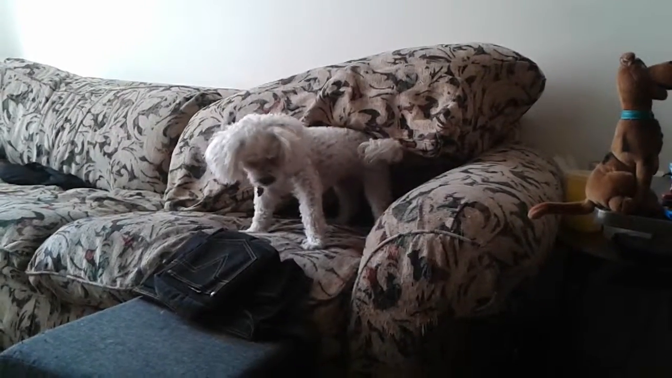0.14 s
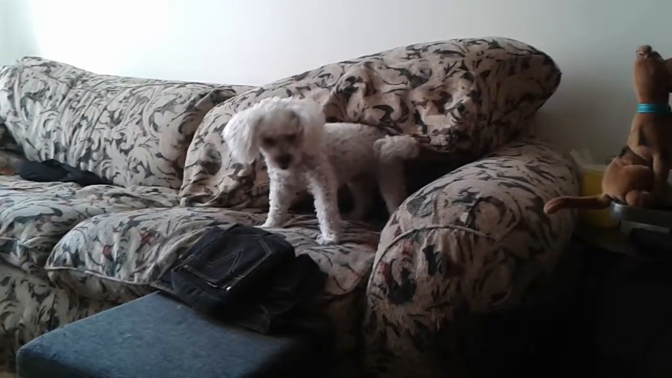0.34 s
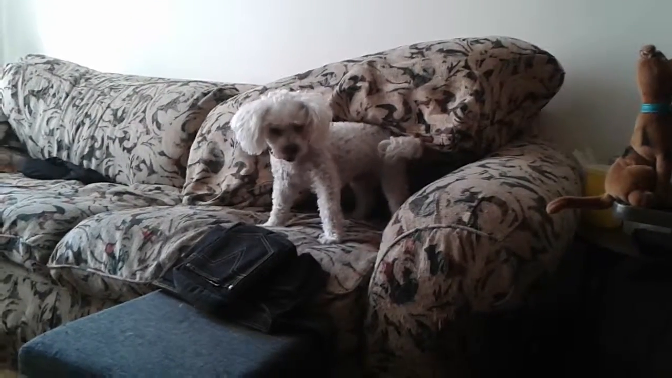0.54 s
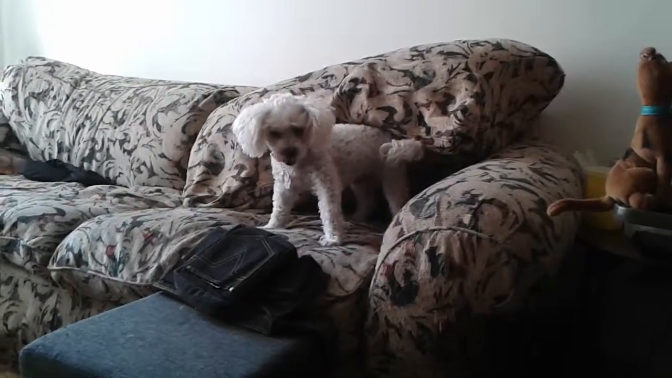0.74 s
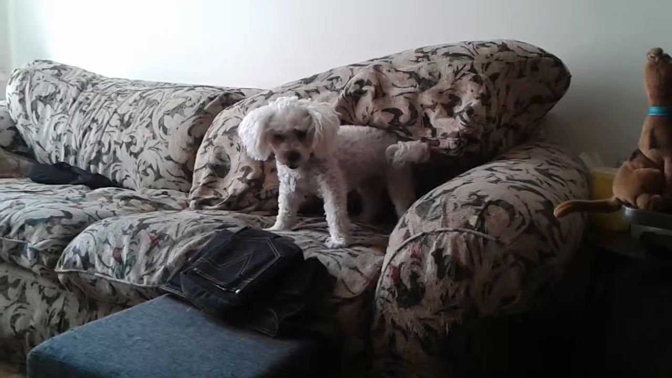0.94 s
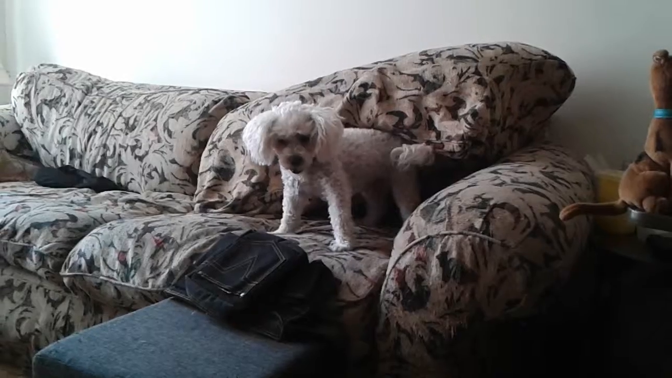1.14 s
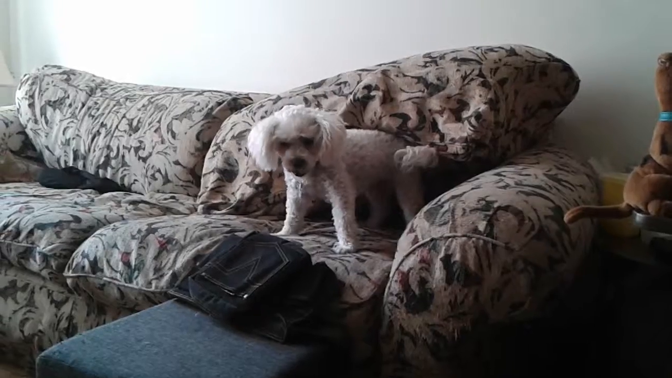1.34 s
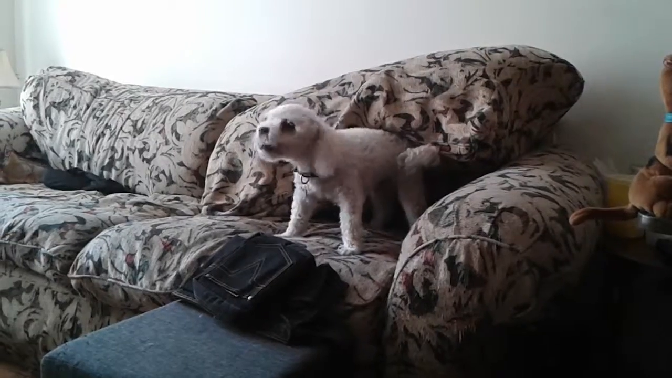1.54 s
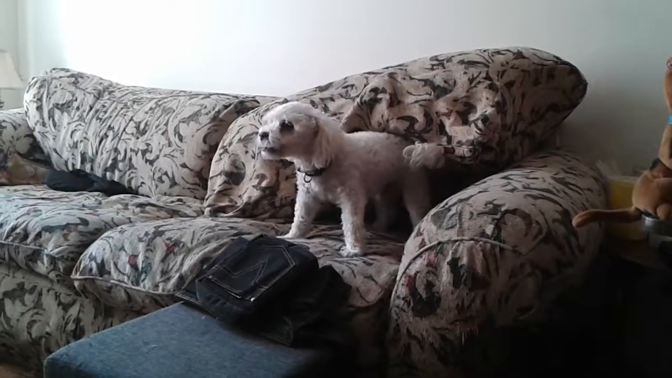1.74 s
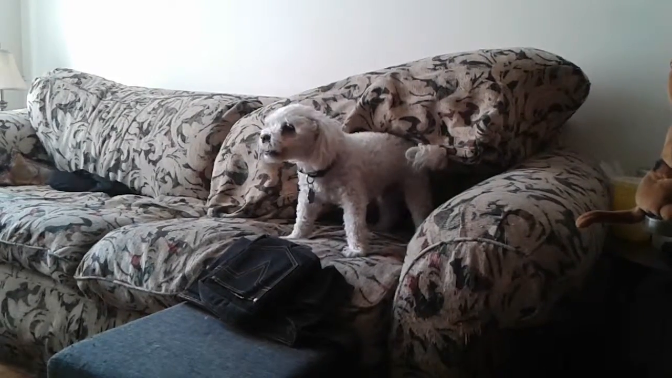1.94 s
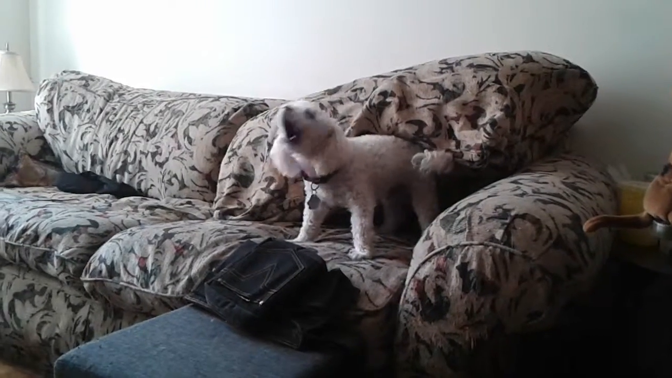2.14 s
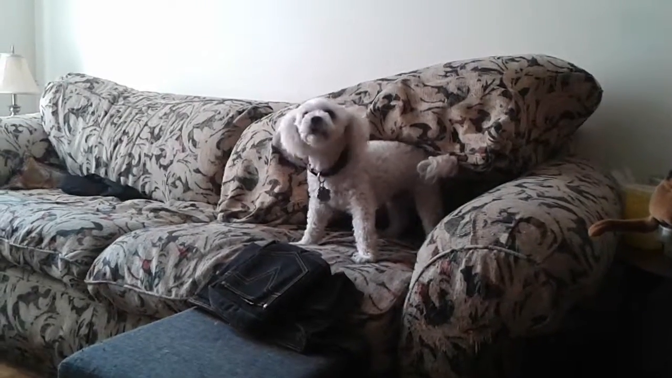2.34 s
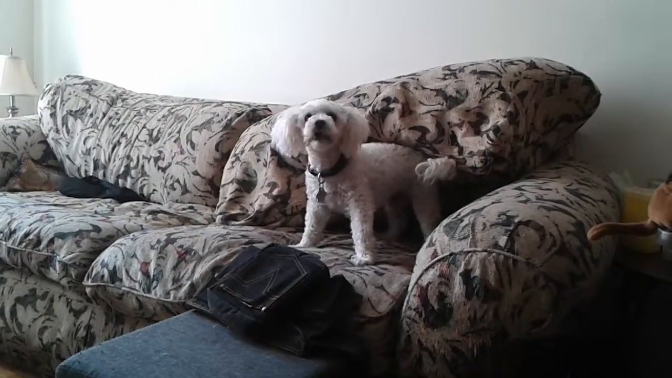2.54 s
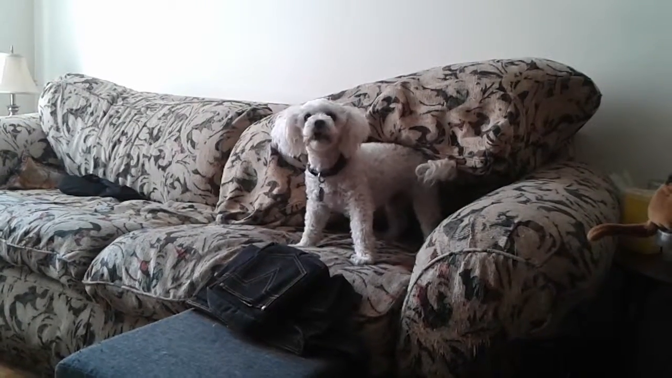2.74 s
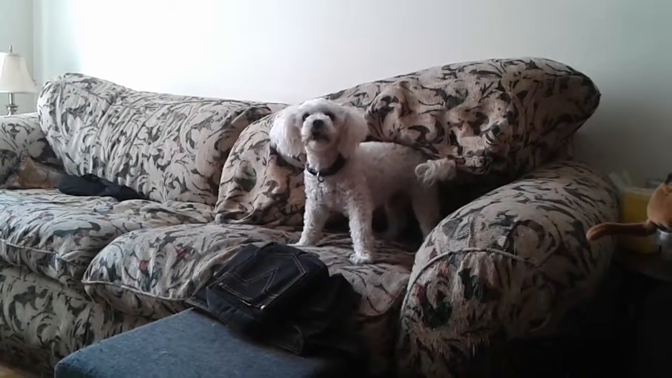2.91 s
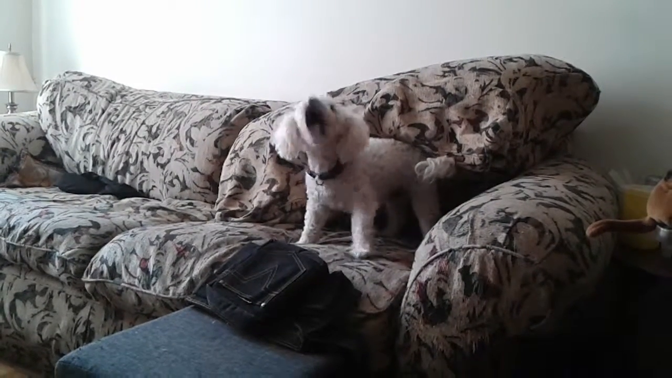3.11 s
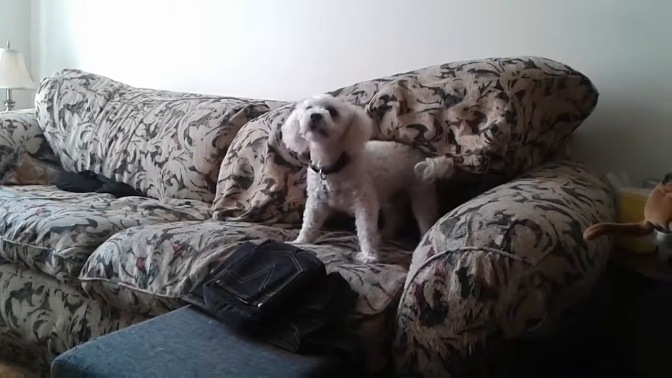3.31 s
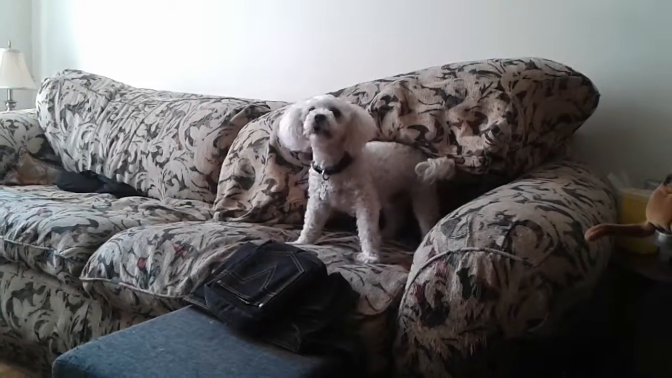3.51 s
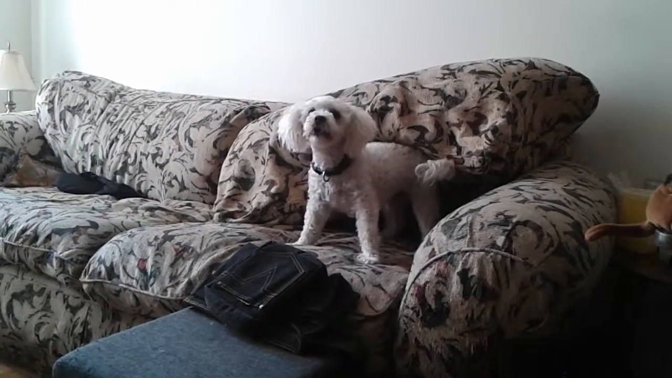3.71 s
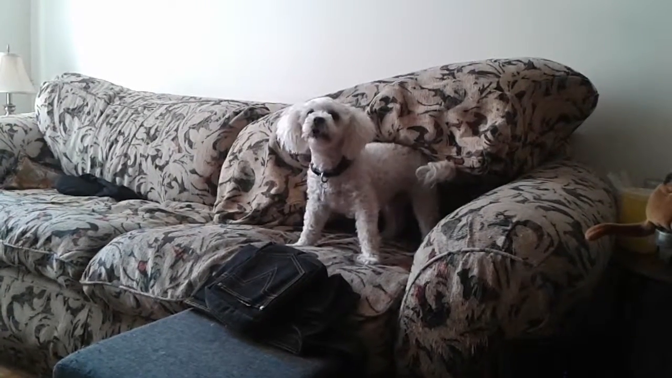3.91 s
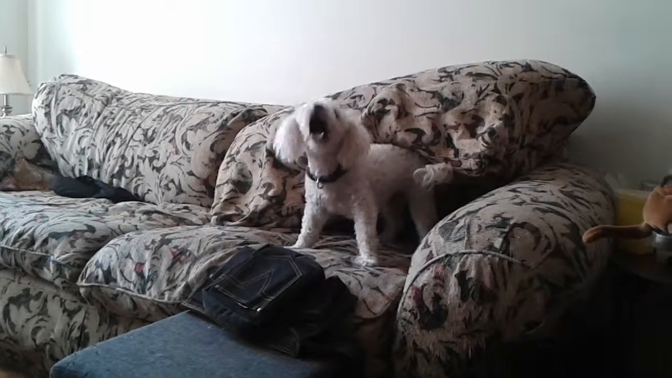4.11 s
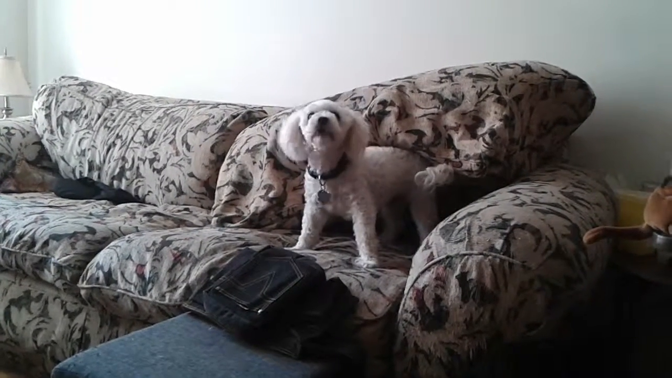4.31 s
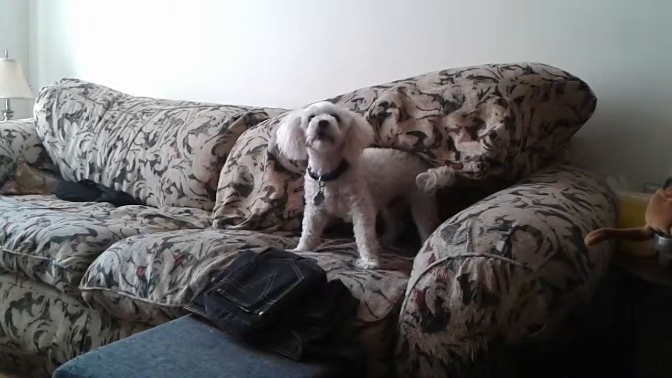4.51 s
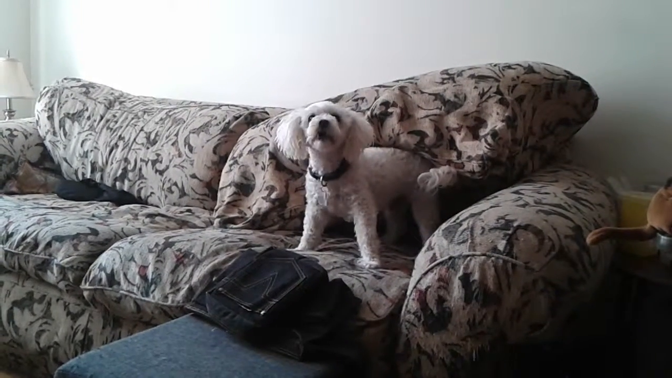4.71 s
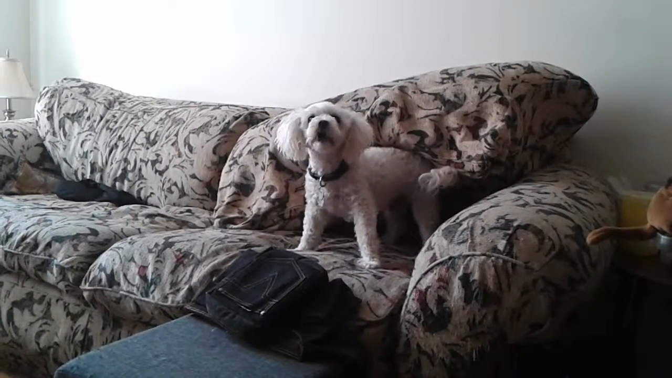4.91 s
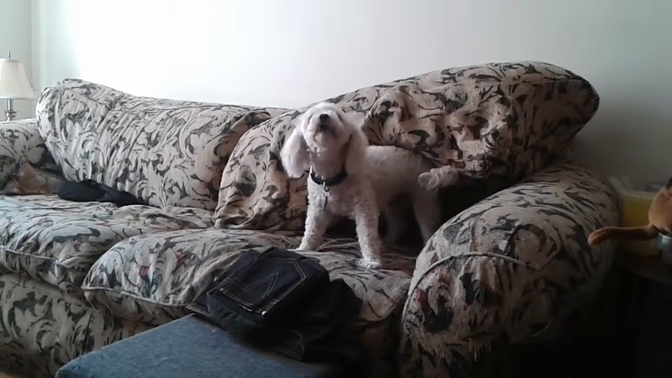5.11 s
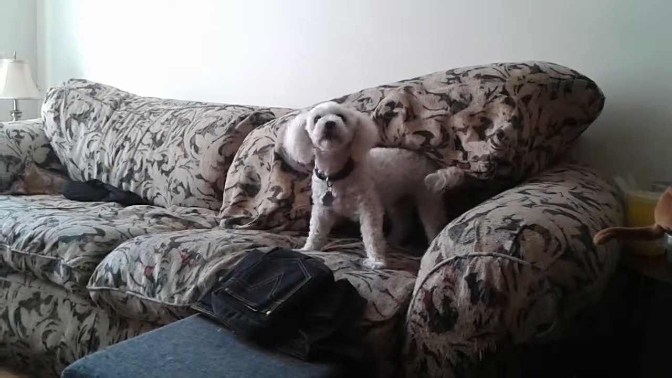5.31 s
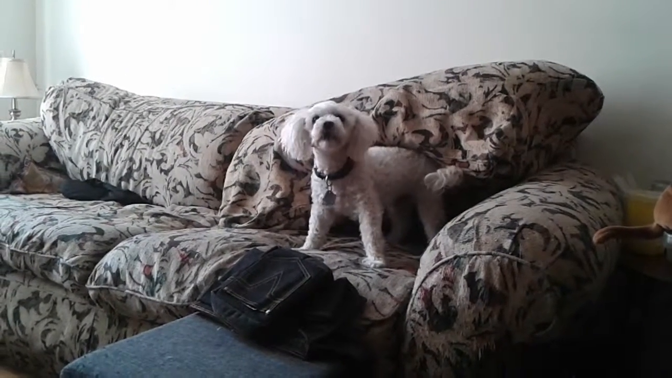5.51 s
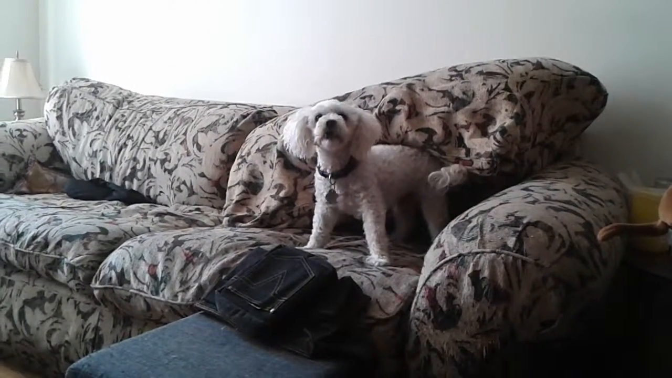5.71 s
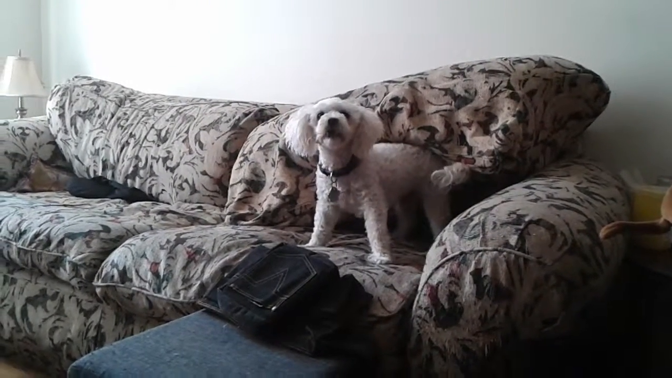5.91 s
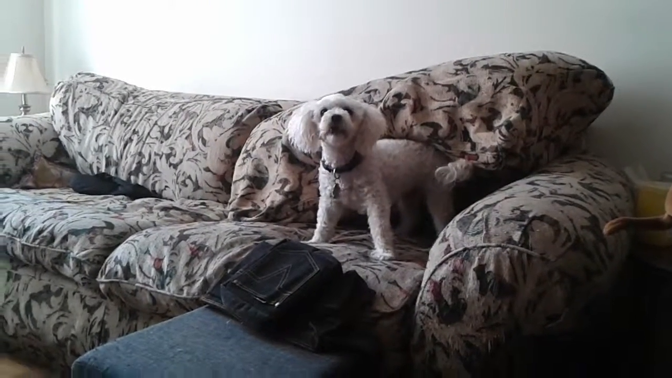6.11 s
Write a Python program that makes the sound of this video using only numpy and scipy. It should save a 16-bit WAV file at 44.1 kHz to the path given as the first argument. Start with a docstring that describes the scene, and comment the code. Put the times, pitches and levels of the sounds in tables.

```python
"""A quiet room tone over a far-off appliance hum comes first, then a puff of breath and thin nose whistles.
A small dog on a couch, near a camera, yips five times, with clicks, grumbles and whines around the yips.
The voice is a bank of partials shaped by the throat, breath is filtered noise, whistles are gliding partials.
A soft furnished room answers in single echoes and a tail.
The first yip makes the gain control turn down."""
import sys
import numpy as np
from scipy import signal
from scipy.fft import rfft, irfft, next_fast_len
from scipy.io import wavfile
from scipy.ndimage import uniform_filter1d, minimum_filter1d

SR = 44100
rng = np.random.default_rng(int(sys.argv[2]) if len(sys.argv) > 2 else 0)


def wrap_up_sound(samples):
    """Save the sound to the file named by the first command line argument, as 16-bit audio."""
    columns = np.atleast_2d(samples).T
    # keep every value between -1 and 1, then stretch to whole-number steps
    tamed = np.clip(columns, -1, 1)
    steps = np.round(tamed * 32767).astype(np.int16)
    wavfile.write(sys.argv[1], SR, steps)


N = 271199
EDGE_HZ = 14800  # upper band edge of the recorder; the voice has no partials above it


def gain_of(db):
    """Turns dB into an amplitude factor."""
    return 10 ** (np.asarray(db) / 20)


def evened(x):
    """Scales a sound to rms 1."""
    return x / np.sqrt(np.mean(x ** 2) + 1e-20)


def read(points, hz):
    """Reads a spectrum between its points on a log-frequency axis."""
    point_hz, value = np.transpose(points)
    return np.interp(np.log(hz + 1), np.log(point_hz + 1), value)


def add(mix, start_s, sound):
    """Adds a sound to the mix at start_s, cut at the end of the mix."""
    part = mix[round(start_s * SR):][:len(sound)]
    part += sound[:len(part)]


def played(rows):
    """Draws the curves of a call at sample rate: its start in seconds, then every other column."""
    time_s, *columns = np.transpose(rows)
    t = np.arange(time_s[0], time_s[-1], 1 / SR)
    return time_s[0], [np.interp(t, time_s, column) for column in columns]


def low_cut(x, order, hz):
    """Removes the sound below hz."""
    return signal.sosfilt(signal.butter(order, hz, "high", fs=SR, output="sos"), x)


def wander(count, hz):
    """Random wobble of rms 1, up to hz."""
    smooth = signal.butter(2, hz, fs=SR, output="sos")
    return evened(signal.sosfilt(smooth, rng.standard_normal(count + 4000))[4000:])


def coloured(x, points):
    """Filters a sound by a spectrum in dB."""
    hz = np.fft.rfftfreq(len(x), 1 / SR)
    return irfft(rfft(x) * gain_of(read(points, hz)), len(x))


def resonate(x, hz, width):
    """Shifts hz down to zero, smooths twice, and shifts back: a steep resonance."""
    turn = np.exp(2j * np.pi * hz * np.arange(len(x)) / SR)
    r = np.exp(-np.pi * width / SR)
    smoothed = signal.lfilter([(1 - r) ** 2], [1, -2 * r, r * r], x / turn)
    return 2 * (turn * smoothed).real


# spectrum of room tone and preamp hiss: hz [Hz], level_db [dB per Hz, relative]
AIR_SPECTRUM = [(21, -48.5), (35, -22.5), (104, -4), (134, -16), (169, -7.5), (201, -5), (501, -17.5),
                (752, -14.5), (1420, -16.5), (2740, -20), (3620, -29), (4670, -20.5), (6010, -36),
                (13200, -46), (15000, -57.5)]
# likeness of left and right in the room tone: hz [Hz], likeness [-1 to 1]
AIR_LIKENESS = [(60, 0.94), (130, 0.86), (290, 0.76), (630, 0.93), (1380, -0.6), (3030, -0.13),
                (6630, 0.38), (14500, -0.32)]
# bands of the wavering appliance hum: pitch_hz [Hz], width_hz [Hz], level_db [dB]
HUM_BANDS = [(59.4, 11, -78.5), (114.3, 12, -70), (169, 15, -64.5), (234, 14, -68.5)]
AIR_DB = -58.5  # rms of the room tone before the ports and the recorder


def air():
    """Room tone and hiss as random short-time spectra, and the hum as noise through narrow resonances."""
    frames, hz = N // 256 + 5, np.fft.rfftfreq(1024, 1 / SR)
    a, b, c, d, patches = rng.standard_normal((frames, 513, 5)).T
    patches_db = evened(uniform_filter1d(uniform_filter1d(patches, 12, 0), 14, 1))
    likeness = np.clip(read(AIR_LIKENESS, hz), -1, 1)[:, None]
    left = a + 1j * b
    right = likeness * left + np.sqrt(1 - likeness ** 2) * (c + 1j * d)
    spectra = np.array([left, right]) * gain_of(read(AIR_SPECTRUM, hz)[:, None] + patches_db)
    tone = signal.istft(spectra, nperseg=1024, noverlap=768)[1][:, :N]
    hum = sum(gain_of(level_db) * evened(resonate(rng.standard_normal(N), pitch_hz, width_hz))
              for pitch_hz, width_hz, level_db in HUM_BANDS)
    return gain_of(AIR_DB) * evened(tone) + hum


# puffs of the dog's breath: start_s [s], level_db [dB], rise_s [s], t60_s [s],
# ring_hz [Hz, centre of the nostril ring], ring_db [dB, relative to the rush]
BREATH_PUFFS = [(0.37, -63.5, 0.0058, 0.28, 3880, -11), (0.722, -59, 0.013, 0.31, 4340, -5),
                (1.37, -54.5, 0.013, 0.25, 1940, -12), (1.385, -53.5, 0.018, 0.22, 4310, -8.5),
                (3.595, -49, 0.0064, .12, 2280, -4), (3.64, -59, 0.019, 0.31, 2317, -8),
                (4.083, -55.5, 0.0068, 0.39, 2400, -5), (4.672, -52, 0.017, 0.19, 3210, 1.5),
                (4.952, -61, 0.0075, 0.18, 2620, -8.5), (5.074, -48.5, 0.025, 0.77, 2650, -12),
                (5.552, -62.5, 0.062, 1.4, 7910, 1)]
# spectrum of the rush: hz [Hz], level_db [dB per Hz, relative]
PUFF_SPECTRUM = [(300, -27.5), (700, -4), (1500, -1), (2500, 1), (4500, -2), (5500, -20.5), (7000, -25.5),
                 (8400, -11.5), (10000, -32.5)]


def puff(start_s, level_db, rise_s, t60_s, ring_hz, ring_db):
    """Rushing air with one nostril resonance on top: noise that rises fast and dies away."""
    t, noise = np.arange(SR // 2) / SR, rng.standard_normal(SR // 2)
    ring = gain_of(ring_db) * evened(resonate(noise, ring_hz, width=350))
    rush = evened(coloured(noise, PUFF_SPECTRUM)) + ring
    rise = np.minimum(t / rise_s, 1) ** 2
    decay_db = -60 * np.maximum(t - rise_s, 0) / t60_s
    flutter_db = 2.5 * wander(len(t), hz=150)
    return start_s, gain_of(level_db + decay_db + flutter_db) * rise * rush


# nose whistles: start_s, crest_s, end_s [s], start_hz, crest_hz, end_hz [Hz],
# first_db and octave_db [dB, fundamental and octave at the crest],
# onset_db [dB, further change of the fundamental at the start]
NOSE_WHISTLES = [(.48, .62, 0.71, 3595, 3580, 3490, -60.5, -79.5, 1.5),
                 (2.819, 3.03, 3.13, 3740, 3490, 3490, -58, -46, -1),
                 (3.782, 3.968, 4.05, 3526, 3600, 3560, -44, -35, -15),
                 (5.806, 5.887, 5.955, 3430, 3370, 3490, -63.5, -45.5, 9.5)]
# third and fourth partial of a whistle: level_db [dB, relative to the octave]
WHISTLE_UPPER = [-36, -31]
SWELL_DB, SINK_DB = -8, -4.5  # level at the start and at the end, relative to the crest
FLICK, FLICK_S = 0.033, .012  # the pitch starts this share high and settles with this time constant


def whistle(start_s, crest_s, end_s, start_hz, crest_hz, end_hz, first_db, octave_db, onset_db):
    """A second, high oscillator in the nose: four thin partials that swell, sink and glide."""
    t, points_s = np.arange(start_s, end_s, 1 / SR), [start_s, crest_s, end_s]
    glide_hz = uniform_filter1d(np.interp(t, points_s, [start_hz, crest_hz, end_hz]), size=2000)
    hz = glide_hz * (1 + FLICK * np.exp((start_s - t) / FLICK_S))
    wobble = 0.0016 * wander(len(hz), hz=80) + 0.0033 * wander(len(hz), hz=15)
    turns = np.cumsum(hz * (1 + wobble)) / SR
    levels_db = [first_db + np.interp(t, points_s, [onset_db, 0, 0]), octave_db]
    levels_db += [octave_db + db for db in WHISTLE_UPPER]
    tone = sum(gain_of(db) * np.cos(2 * np.pi * (k + 1) * turns) for k, db in enumerate(levels_db))
    shape_db = np.interp(t, points_s, [SWELL_DB, 0, SINK_DB]) + 2.1 * wander(len(hz), hz=40)
    return start_s, np.sqrt(2) * tone * gain_of(shape_db) * signal.windows.tukey(len(hz), .15)


# faint clicks: start_s [s], level_db [dB, top of the decay], pitch_hz [Hz], t60_s [s]
FAINT_CLICKS = [(0.973, -40.5, 4430, 0.0083), (2.056, -44, 3390, 0.016), (2.087, -56, 6000, .008),
                (2.099, -63.5, 4010, 0.013), (3.715, -44, 5000, 0.011)]


def click(start_s, level_db, pitch_hz, t60_s):
    """A short ring, widened by a random pitch wobble, with a soft edge."""
    t = np.arange(2000) / SR
    wobbled_s = np.cumsum(1 + 0.34 * wander(2000, hz=900)) / SR
    edge = np.minimum(t / 0.00052, 1)
    return start_s, gain_of(level_db - 60 * t / t60_s) * edge * np.sin(2 * np.pi * pitch_hz * wobbled_s)


# one curve a call, five yips and two quiet grumbles: time_s [s], effort_db [dB], pitch_hz [Hz];
# in a yip the folds start in a low register and jump up to a high one
YIP_CURVES = [
    [(1.532, -58.5, 269.6), (1.556, -33.5, 323.5), (1.572, -31, 407.8), (1.592, -23, 420.7),
     (1.596, -5.5, 1068), (1.617, -15.5, 1143), (1.626, -17, 1098), (1.636, -10, 966), (1.655, -9, 941.6),
     (1.674, -18, 810.5), (1.69, -34, 615)],
    [(2.236, -43, 427.3), (2.255, -28, 560), (2.273, -15, 906), (2.288, -12.5, 916), (2.3, -12.5, 1119),
     (2.318, -20, 1124), (2.333, -12, 982), (2.348, -15, 926.5), (2.362, -24.5, 770), (2.378, -38.5, 560)],
    [(3.2, -38, 263.4), (3.215, -29.5, 342.8), (3.232, -21, 388), (3.246, -12.5, 384.6), (3.25, -15, 938),
     (3.26, -9.5, 1048), (3.275, -10.5, 1103), (3.296, -10, 1043), (3.32, -19, 855.6), (3.352, -33, 481)],
    [(4.183, -43, 255), (4.202, -28.5, 321), (4.218, -20.5, 386.3), (4.234, -10, 370.7),
     (4.238, -16.5, 914), (4.254, -11.5, 985.4), (4.272, -13, 1063), (4.296, -13, 977.3),
     (4.312, -23.5, 786.5), (4.335, -29, 523)],
    [(4.99, -53, 381), (5.005, -56, 376.4), (5.03, -61, 371), (5.048, -55, 348), (5.09, -56.5, 337.5),
     (5.135, -46, 291)],
    [(5.125, -43, 300.6), (5.15, -31.5, 334.1), (5.172, -19.5, 367.6), (5.186, -15, 377.3),
     (5.19, -19.5, 834), (5.204, -13, 990), (5.212, -14, 1011), (5.235, -13.5, 969), (5.252, -23.5, 811),
     (5.278, -32.5, 514)],
    [(5.455, -50.5, 208), (5.48, -55.5, 217.8), (5.52, -51, 243.6), (5.545, -56, 257)],
]
# the voice of each call: tilt_db [dB per octave], ring_db [dB, back of the throat],
# half_share [0-1, half-pitch lines], mouth [factor on the throat],
# low_rough and high_rough [0-1, roughness of the low and the high register]
YIP_VOICES = [(-1, -1.5, .03, 1.01, .3, 0.036), (-.5, -1.5, 0.097, 0.998, 0.25, 0.11),
              (-1.3, -5, 0.29, 1.042, .25, 0.14), (-1, -4, 0.13, 1.037, 0.28, 0.1),
              (-7.5, 13, .02, 0.8, 0.088, .1), (-0.2, 3.5, 0.41, .99, 0.29, 0.13),
              (-3.5, -20, .1, 0.77, .08, .1)]
# resonances of throat and mouth: hz [Hz, at mouth factor 1], level_db [dB, relative]
THROAT_SPECTRUM = [(200, -37), (330, -23.5), (500, -31.5), (700, -8), (1050, 1.5), (1400, -14.5),
                   (2000, -3.5), (2500, -11.5), (2900, -14), (3350, -24), (3900, -17), (4700, -23.5),
                   (5500, -32.5), (8000, -38.5), (11000, -66.5), (15000, -94)]
HALF_DB = -2  # half-pitch lines at full share
LOW_HALF = .15  # share of half-pitch lines in the low register
BREATH_TILT_DB = 4.5  # per octave: rushing air is brighter than the voice
REGISTER_HZ = 620  # below it the voice is hoarse
FULL_DB = -9.5  # effort of a full, open voice
ROUGH_PER_DB = 0.0325  # a weaker voice is rougher by this share
SHUT_PER_DB = .004  # the mouth closes as the effort drops
LOW_OPEN = 0.067  # the mouth gapes this share wider in the low register


def yip(rows, tilt_db, ring_db, half_share, mouth, low_rough, high_rough):
    """Partials of the folds, jittered when hoarse, and gated breath pass a throat that opens and shuts."""
    start_s, (effort_db, hz) = played(rows)
    count = len(hz)
    low = 1 / (1 + (hz / REGISTER_HZ) ** 8)  # near 1 in the low register
    slack_db = np.maximum(FULL_DB - effort_db, 0)
    rough = (high_rough + (low_rough - high_rough) * low) * (1 + ROUGH_PER_DB * slack_db)
    rough = np.clip(rough, 0, 1)
    half_share = np.clip(half_share + (LOW_HALF - half_share) * low, 0, 1)
    mouth = mouth * (1 + LOW_OPEN * low - SHUT_PER_DB * slack_db)
    turns = np.cumsum(hz * (1 + .11 * rough * wander(count, hz=250))) / SR
    throat = [(f, db + tilt_db * np.log2(f / 1000) + ring_db * np.exp(-(np.log2(f / 2900) / 0.45) ** 2))
              for f, db in THROAT_SPECTRUM]

    k = np.arange(1, 61)[:, None] / 2  # whole partials and the half-pitch lines between them
    strength = gain_of(read(throat, k * hz / mouth)) * (k * hz < EDGE_HZ)
    strength *= np.where(k % 1, half_share * gain_of(HALF_DB), 1)
    # unless the voice is clear, higher partials come and go on their own
    flicker = evened(uniform_filter1d(rng.standard_normal(strength.shape), size=350, axis=1))
    strength *= gain_of(np.minimum(1.1 * k, 5) * np.minimum(rough / .15, 1.2) * flicker)
    partials = strength * np.cos(2 * np.pi * k * turns + 1.3 * k ** 2)
    folds = partials.sum(0) / np.sqrt((strength ** 2).sum(0) / 2)

    gate = 0.37 + np.exp(-(turns % 1) / .3)  # a burst of air in each cycle
    airy_throat = [(f, db + BREATH_TILT_DB * np.log2(f / 1000)) for f, db in throat]
    breath = coloured(gate * rng.standard_normal(count), airy_throat)
    breath = .7 * rough ** 1.5 * evened(low_cut(breath, 4, 650))

    shimmer = gain_of(8.0 * rough * wander(count, hz=120))  # uneven cycles
    jump = uniform_filter1d(abs(np.gradient(np.log2(hz))) * SR, size=200)  # octaves a second
    voiced = 1 / (1 + (jump / 70) ** 2)  # the voice breaks while the register jumps
    voice = gain_of(effort_db) * (voiced * folds * shimmer + breath) * signal.windows.tukey(count, .2)
    return start_s, low_cut(voice, 4, 330)  # the voice carries no bass below about 330 Hz


# one curve a whine: time_s [s], pitch_hz [Hz], level_db [dB]
WHINE_CURVES = [
    [(2.128, 690, -68), (2.146, 712, -35), (2.184, 838, -38), (2.212, 868, -52), (2.225, 861, -62.5)],
    [(3.38, 933, -33), (3.41, 930, -30), (3.472, 904, -27.5), (3.5, 905, -24.5), (3.54, 896, -26.5),
     (3.557, 896, -35), (3.572, 884, -68)],
    [(5.535, 506, -49), (5.568, 511, -40.5), (5.592, 521, -42), (5.63, 562.5, -35), (5.665, 578, -39),
     (5.69, 577, -39.5), (5.72, 627, -39), (5.74, 698, -43), (5.783, 693, -40.5), (5.805, 687, -59),
     (5.83, 685, -46.5)],
    [(5.938, 834, -61), (5.948, 836, -42), (5.96, 811, -50), (5.975, 801, -39), (5.998, 813, -36),
     (6.03, 808, -40), (6.062, 803, -53), (6.145, 800, -58.5)],
]
# overtones of each whine: over_db [dB, relative to the fundamental], tilt_db [dB per octave],
# onset_db [dB, change at the onset], onset_s [s, its time constant]
WHINE_OVERTONES = [(-32, -15, 28.5, .025), (-31.5, 2.5, -24, 0.062), (-35.5, -6, 7, 0.042),
                   (-18.5, -18.5, 11, .02)]
# colour of the overtones, mouth shut: hz [Hz], level_db [dB]
MUZZLE_COLOUR = [(900, -21), (1600, -3.5), (2300, 8), (2900, -1), (3600, -16.5), (4500, 8.5), (6000, 2.5),
                 (8000, -7.5), (11000, -29)]
# the voice catches: centre_s [s], half_length_s [s]
VOICE_CATCHES = [(5.604, .012), (5.65, 0.017), (5.703, 0.0095), (5.73, 0.0065)]
CATCH_DB = -17  # at the centre of a catch


def whine(rows, over_db, tilt_db, onset_db, onset_s):
    """A clear fundamental hums through the nose; the shut muzzle lets few overtones out."""
    start_s, (hz, level_db) = played(rows)
    t = np.arange(len(hz)) / SR
    catch = sum(np.maximum(1 - abs(start_s + t - centre_s) / half_length_s, 0)
                for centre_s, half_length_s in VOICE_CATCHES)
    level_db = level_db + CATCH_DB * catch
    turns = np.cumsum(hz * (1 + .004 * wander(len(hz), hz=60))) / SR
    k = np.arange(2, 13)[:, None]
    colour_db = over_db + onset_db * np.exp(-t / onset_s) + 2.7 * wander(len(hz), hz=90)
    colour_db = colour_db + read(MUZZLE_COLOUR, k * hz) + tilt_db * np.log2(k * hz / 2000)
    overtones = (gain_of(colour_db) * np.cos(2 * np.pi * k * turns + k ** 2)).sum(0)
    hum = np.cos(2 * np.pi * turns) + overtones
    return start_s, np.sqrt(2) * gain_of(level_db) * hum * signal.windows.tukey(len(hz), .06)


# first echoes off the wall, floor and couch: delay_s [s], left_db [dB], right_db [dB]
FIRST_ECHOES = [(.0031, -12.5, -10), (.0057, -10.5, -5), (.0094, -12.5, -10), (0.0145, -14, -8),
                (.0198, -11, -14), (.0273, -14, -14)]


def echoes(x):
    """A few single reflections, each of its own random sign in each port."""
    taps = np.zeros((2, 2000))
    signs = rng.choice([-1., 1.], (len(FIRST_ECHOES), 2))
    for (delay_s, *levels_db), sign in zip(FIRST_ECHOES, signs):
        taps[:, round(delay_s * SR)] = sign * gain_of(levels_db)
    return signal.oaconvolve(x[None], taps, axes=1)[:, :N]


# decay of the furnished room: hz [Hz], t60_s [s]
ROOM_DECAY = [(300, 0.51), (700, 0.49), (1000, 0.36), (2000, 0.41), (4000, 0.43), (8000, .35),
              (12000, 0.083)]


def room(x):
    """Sparse taps of random sign, one in every 20 samples, each band dying at its own speed."""
    taps = np.zeros((2, SR))
    at = np.arange(160, SR - 20, 20) + rng.integers(0, 20, (2, (SR - 161) // 20))
    np.put_along_axis(taps, at, rng.choice([-1., 1.], at.shape), 1)
    hz, t, spectra = signal.stft(taps, SR, nperseg=256)
    likeness = np.clip(600 / (hz + 300) - .5, 0, .95)[:, None]  # long waves reach both ports alike
    spectra[1] = likeness * spectra[0] + np.sqrt(1 - likeness ** 2) * spectra[1]
    decay = gain_of(-60 * t / read(ROOM_DECAY, hz)[:, None])
    tail = signal.istft(spectra * decay, SR, nperseg=256)[1]
    return signal.fftconvolve(x[None], tail / np.linalg.norm(tail[0]), axes=1)[:, :N]


def leaned(pair, points):
    """Tilts a channel pair by a left-minus-right spectrum, half up on one side and half down on the other."""
    size = next_fast_len(N)
    lean_db = read(points, np.fft.rfftfreq(size, 1 / SR)) / 2 * np.array([[1], [-1]])
    return irfft(rfft(pair, size) * gain_of(lean_db), size)[:, :N]


# the ports colour the dog's direction: hz [Hz], lean_db [dB, left minus right]
DOG_DIRECTION = [(60, -3.5), (110, 0), (200, 4.5), (370, -0.5), (690, -1), (1270, 0.5), (2330, 4),
                 (4290, 7.5), (7900, 3.5), (14500, -2)]
# the ports colour the room tone: hz [Hz], lean_db [dB, left minus right]
AIR_DIRECTION = [(60, -1.5), (110, -0.5), (200, 0), (370, -0.5), (690, 0.5), (1270, 0.5), (2330, 3.5),
                 (4290, 7), (7900, -2), (14500, -9.5)]
LAG_S = .00007  # the dog reaches the left port this much later
ROOM_DB = -3  # send of the mouth to the room tail
NOSE_ROOM_DB = -20  # sounds from the nose beam at the camera and stir the room less
DOG_DB = 1.0  # gain on the direct sound and the first echoes


def scene():
    """The room tone, and the dog heard directly, by first echoes of its mouth and by the room tail."""
    mouth, nose = np.zeros(N), np.zeros(N)
    for source, rows in ((puff, BREATH_PUFFS), (whistle, NOSE_WHISTLES), (click, FAINT_CLICKS)):
        for row in rows:
            add(nose, *source(*row))
    for rows, voice in zip(YIP_CURVES, YIP_VOICES):
        add(mouth, *yip(rows, *voice))
    for rows, overtones in zip(WHINE_CURVES, WHINE_OVERTONES):
        add(nose, *whine(rows, *overtones))
    both = mouth + nose
    direct = np.array([np.roll(both, round(LAG_S * SR)), both])
    tail = room(gain_of(ROOM_DB) * mouth + gain_of(NOSE_ROOM_DB) * nose)
    dog = gain_of(DOG_DB) * (direct + echoes(mouth)) + tail
    return leaned(dog, DOG_DIRECTION) + leaned(air(), AIR_DIRECTION)


def loudness_db(x, size):
    """Power of both channels, smoothed over size samples."""
    return 10 * np.log10(abs(uniform_filter1d((x ** 2).mean(0), size)) + 1e-12)


def held(level_db, fall_db):
    """Follows peaks at once and lets go by fall_db a second."""
    fall = np.arange(N) * fall_db / SR
    return np.maximum.accumulate(level_db + fall) - fall


def record(dry):
    """Bass cut; gain control that boosts quiet, drops for loud sounds and lets go slowly; limiter; band limit."""
    cut = low_cut(dry, 6, 45)
    boost_db = np.clip(-16.5 - held(loudness_db(cut, size=900), fall_db=6.0), 0, 18)
    r = np.exp(-1 / (0.057 * SR))  # the gain moves with a time constant of 57 ms
    eased_db = signal.lfilter([1 - r], [1, -r], boost_db - boost_db[0]) + boost_db[0]
    boosted = cut * gain_of(eased_db)
    # the limiter takes off 0.47 dB for each dB above -11 dB
    over_db = np.maximum(held(loudness_db(boosted, size=300), fall_db=124.0) + 11, 0)
    limited = boosted / gain_of(0.47 * uniform_filter1d(over_db, size=300))
    # a second, peak-driven gain keeps peaks under full scale
    headroom = minimum_filter1d(np.minimum(.95 / (abs(limited).max(0) + 1e-9), 1), size=301)
    limited = low_cut(limited * uniform_filter1d(headroom, size=151), 2, 35)
    band = signal.firwin(511, EDGE_HZ, window=("kaiser", 9), fs=SR)
    return signal.oaconvolve(limited, band[None], "same")


dry = scene()
out = record(dry)
wrap_up_sound(out)
```